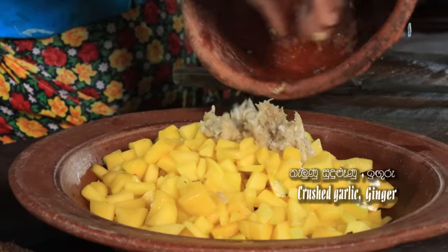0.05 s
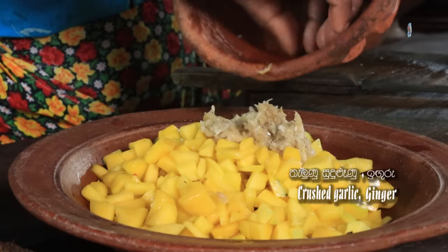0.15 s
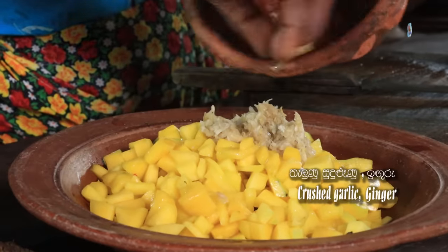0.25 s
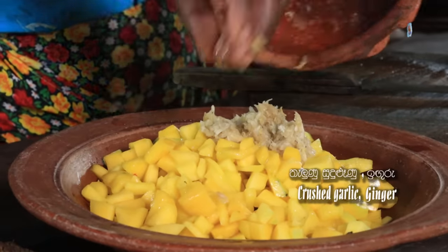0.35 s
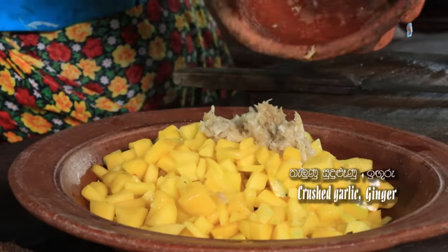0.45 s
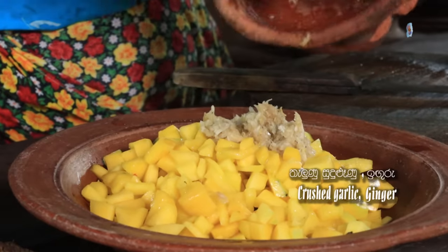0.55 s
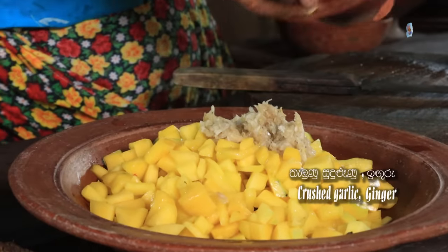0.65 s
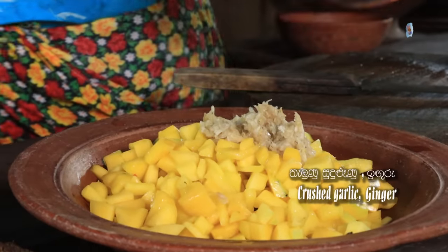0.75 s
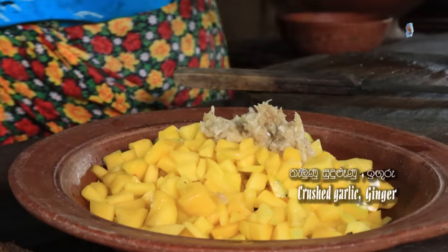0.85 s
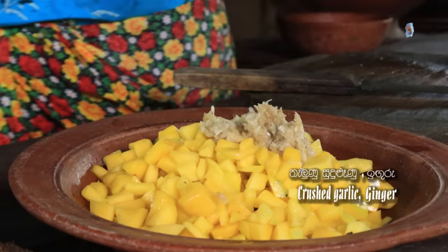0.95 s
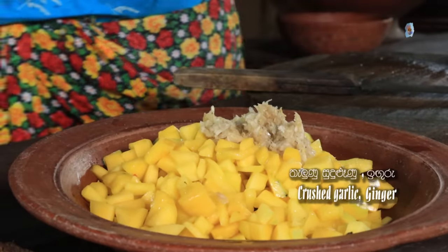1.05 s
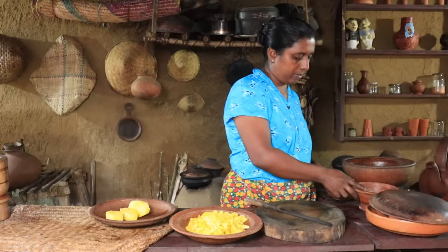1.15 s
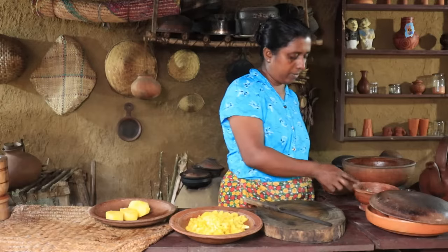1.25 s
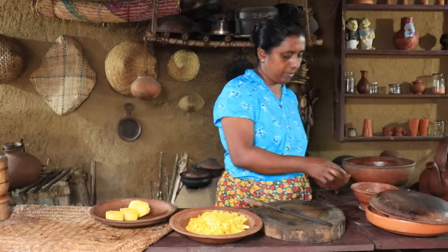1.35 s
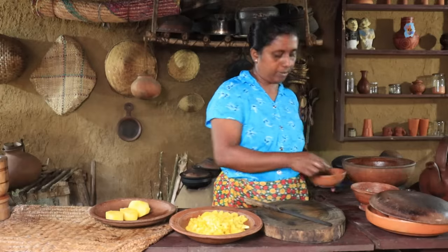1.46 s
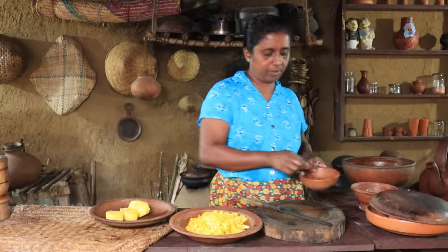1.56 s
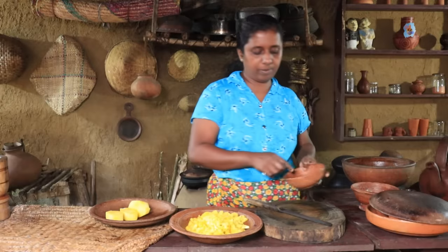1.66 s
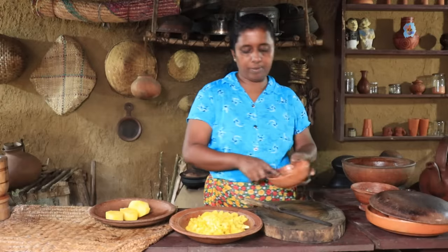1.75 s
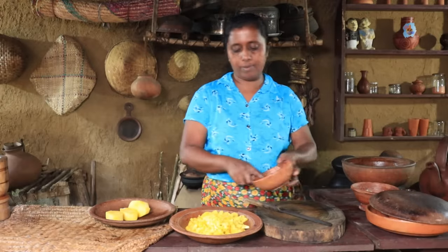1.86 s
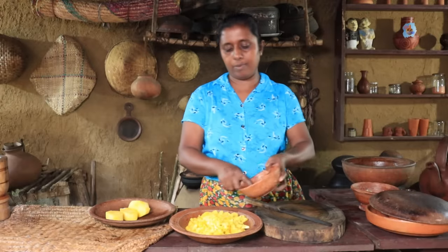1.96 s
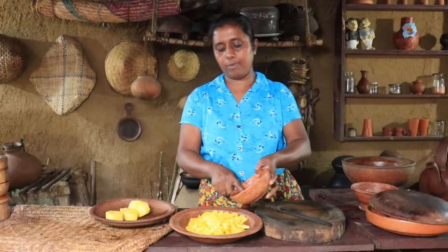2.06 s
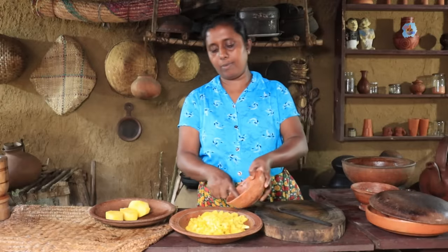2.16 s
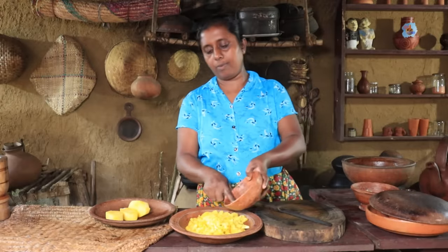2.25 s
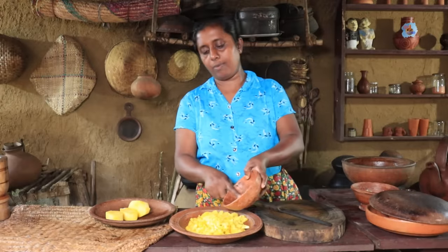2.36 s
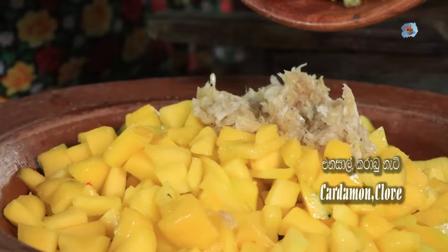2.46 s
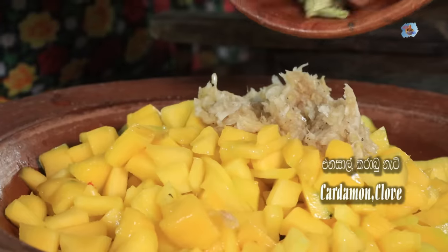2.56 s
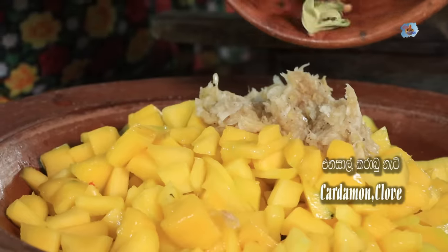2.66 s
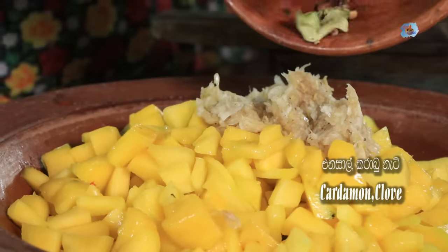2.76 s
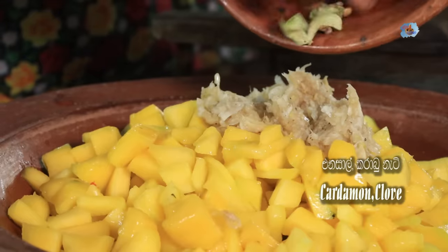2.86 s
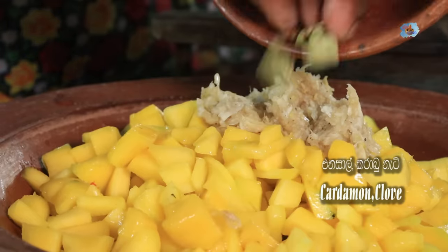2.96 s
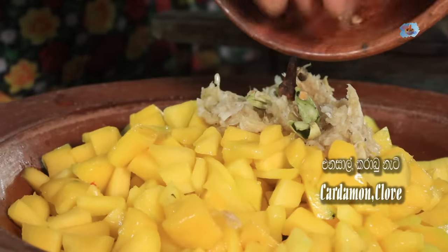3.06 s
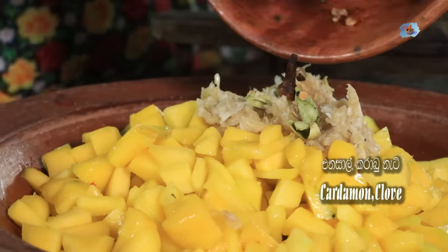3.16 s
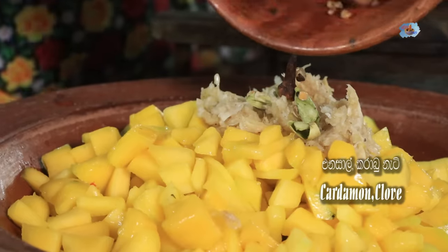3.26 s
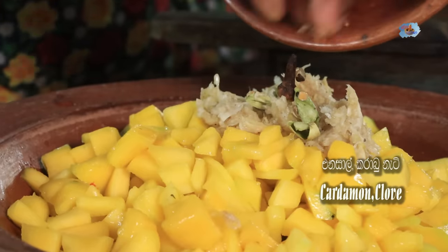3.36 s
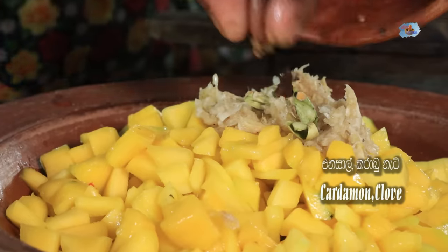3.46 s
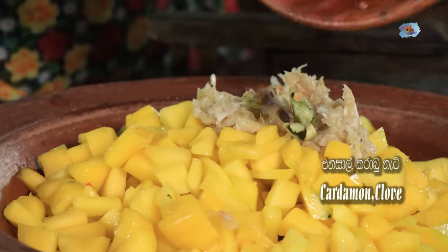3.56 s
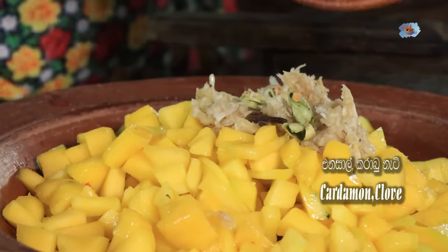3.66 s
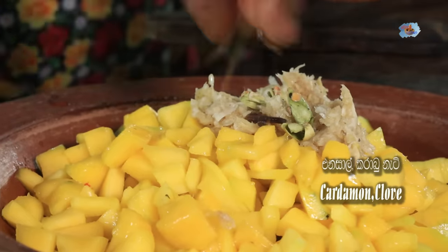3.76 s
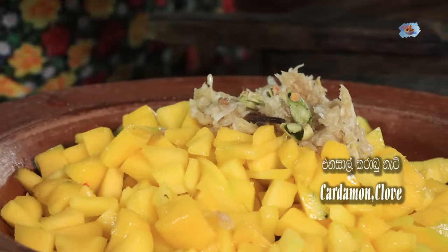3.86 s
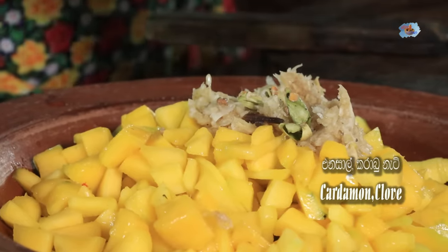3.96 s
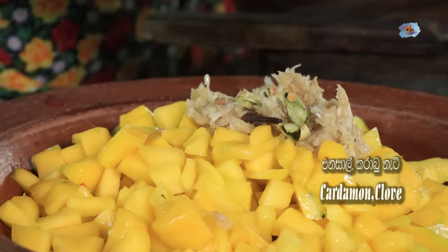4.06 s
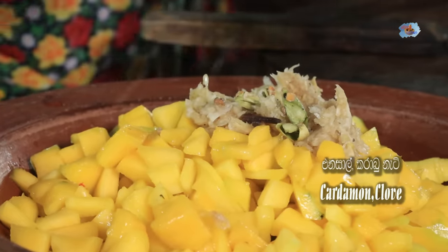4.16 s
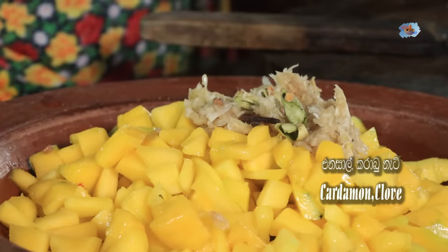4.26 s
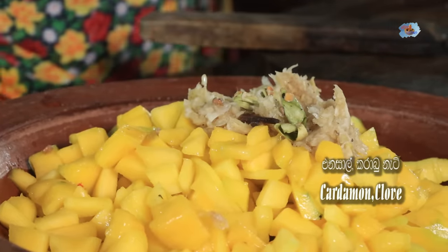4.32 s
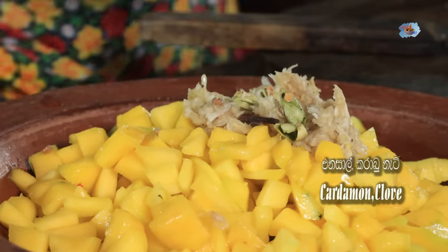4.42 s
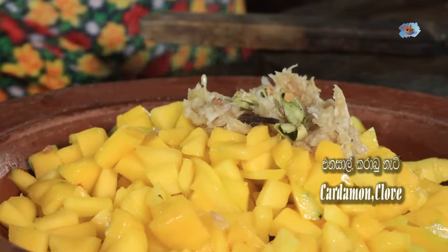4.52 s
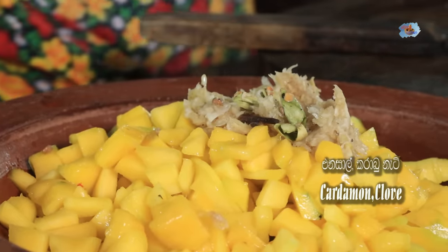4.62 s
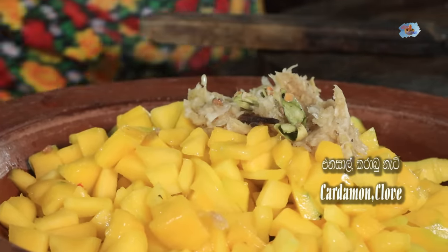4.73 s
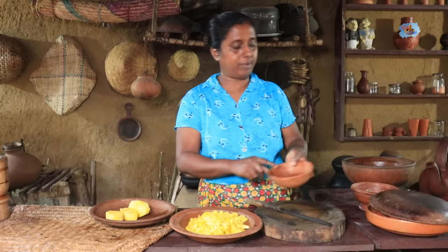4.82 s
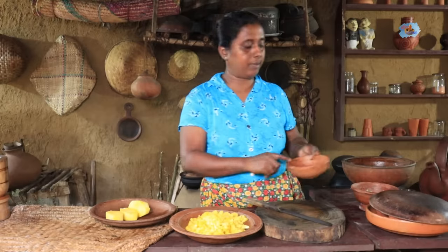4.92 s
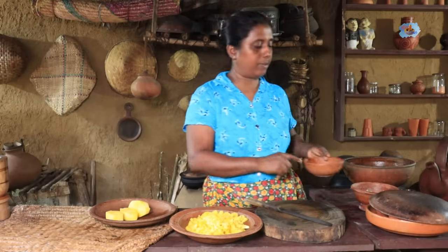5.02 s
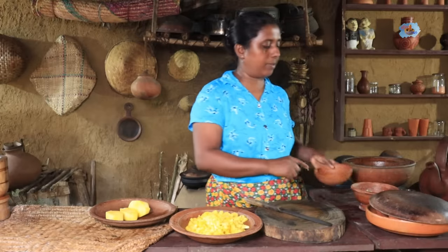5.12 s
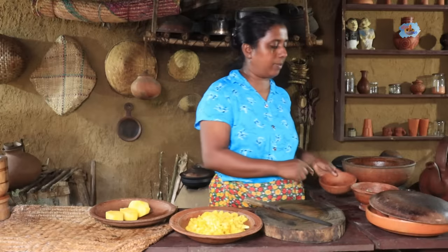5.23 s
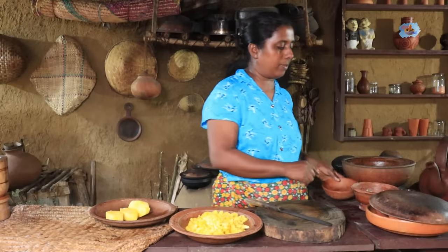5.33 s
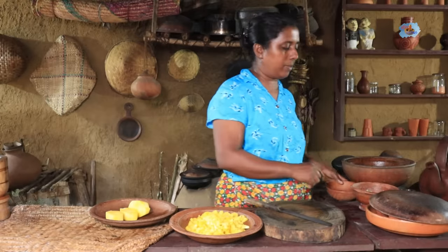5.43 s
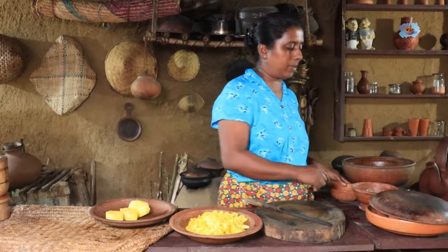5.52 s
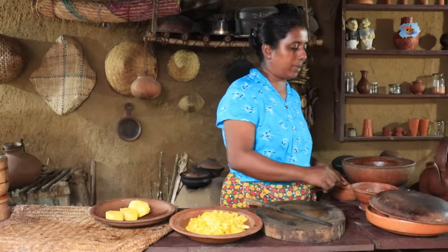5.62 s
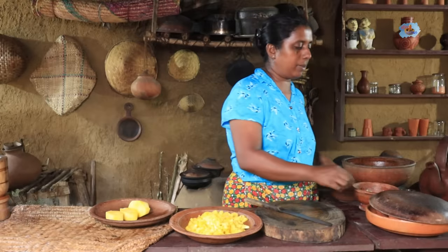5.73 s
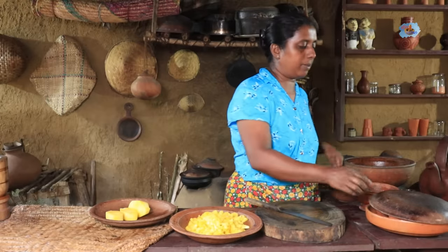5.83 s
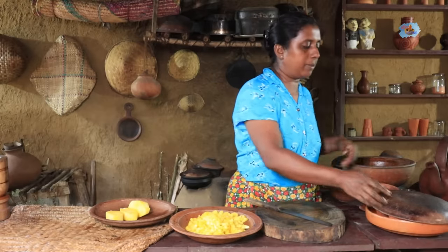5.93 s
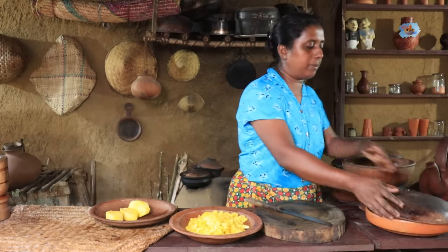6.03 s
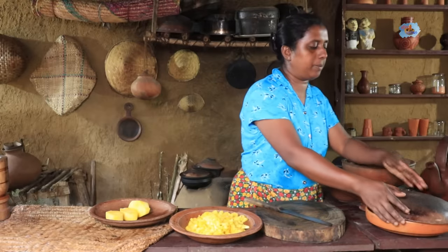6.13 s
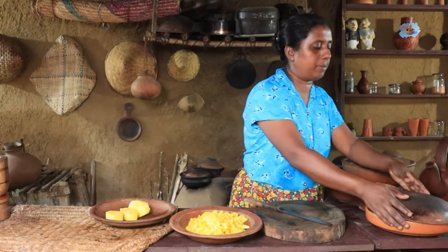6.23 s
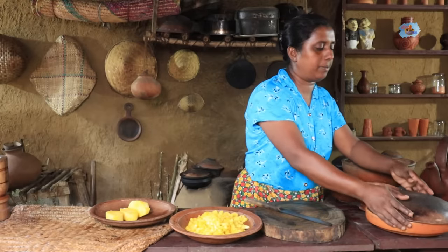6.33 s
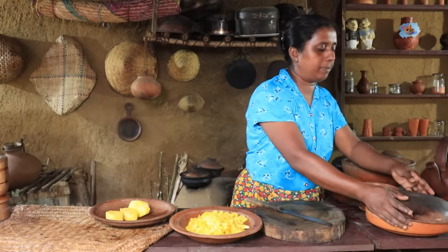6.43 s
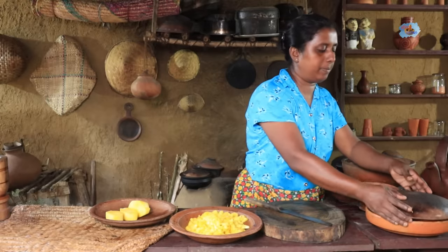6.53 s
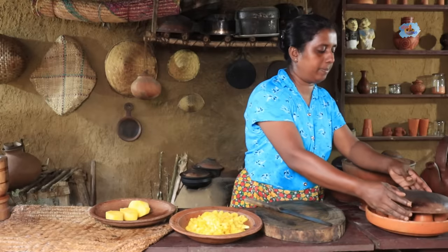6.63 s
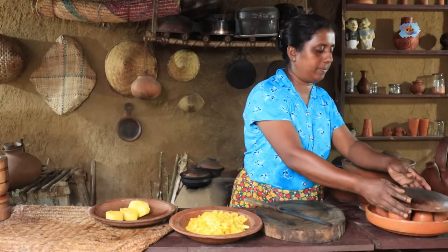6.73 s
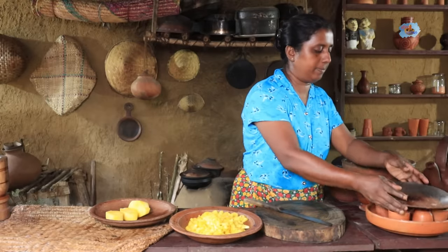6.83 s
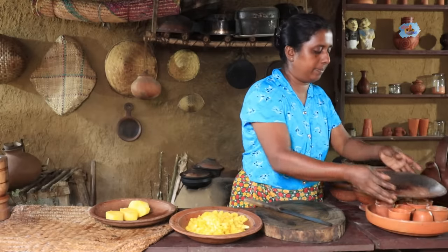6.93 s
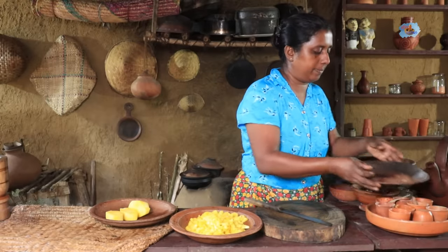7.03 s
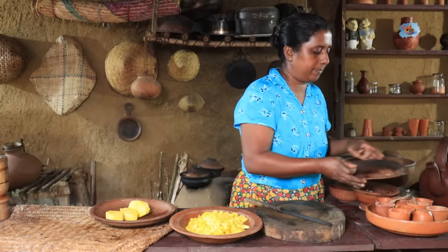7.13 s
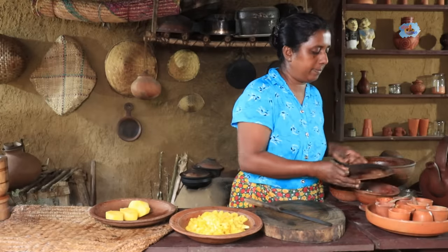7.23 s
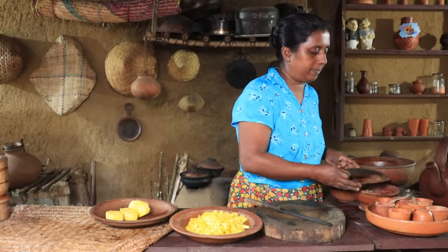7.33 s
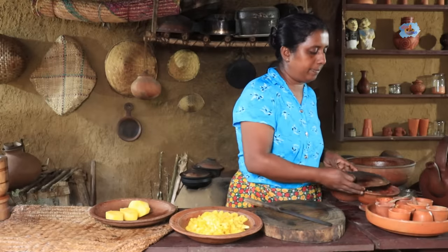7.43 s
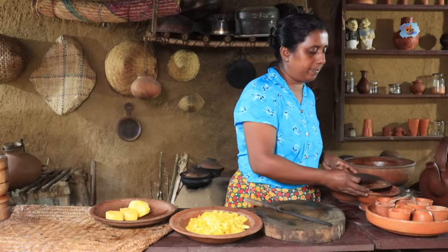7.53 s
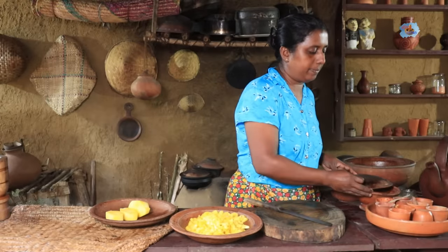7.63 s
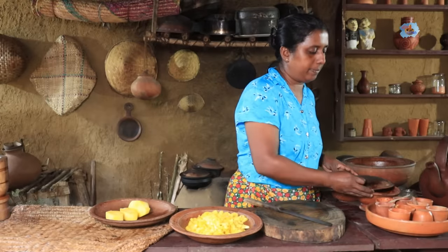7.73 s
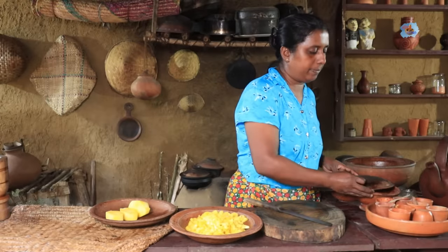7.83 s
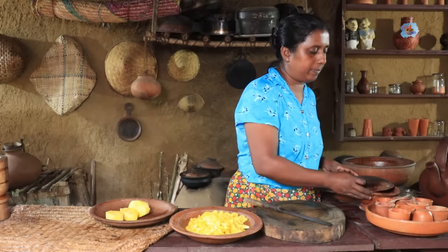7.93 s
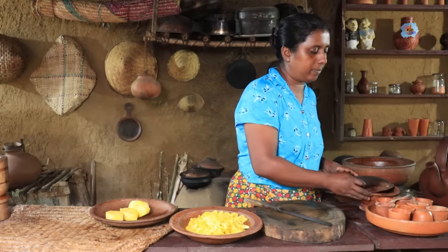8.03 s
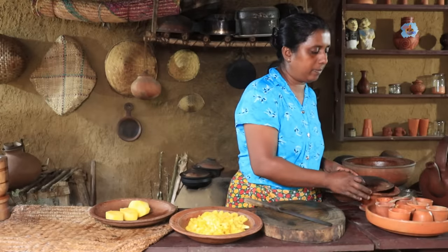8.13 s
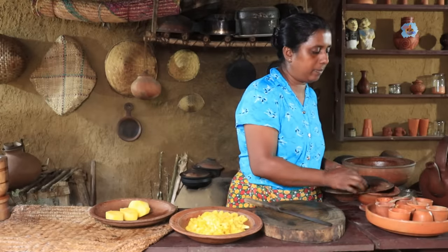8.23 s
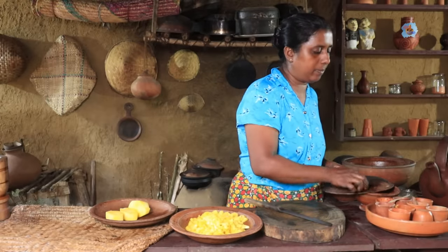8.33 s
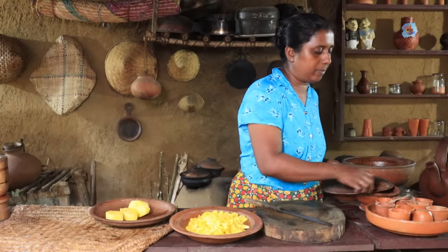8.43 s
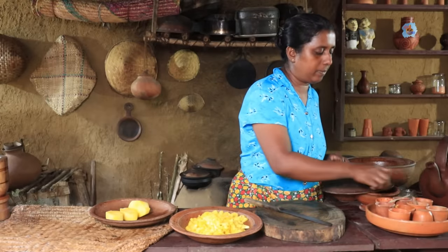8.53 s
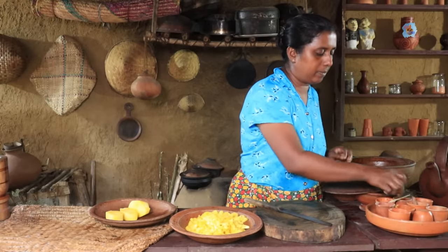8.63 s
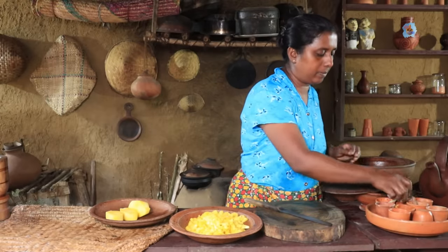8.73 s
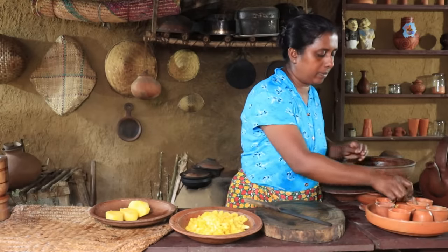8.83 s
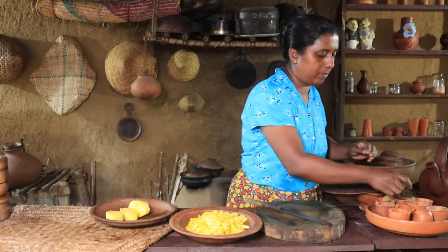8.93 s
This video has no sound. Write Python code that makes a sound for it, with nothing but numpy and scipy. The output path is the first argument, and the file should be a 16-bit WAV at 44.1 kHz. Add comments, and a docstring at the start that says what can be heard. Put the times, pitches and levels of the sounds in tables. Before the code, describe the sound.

Soft scratches and ticks on clay give way to hollow crockery knocks on a wooden table, with birds calling outside a quiet kitchen.

```python
"""Clay vessels in a quiet open kitchen: a bowl set down on a wooden table rocks; a lid scrapes off a wide pan
and is laid on another pot, where it settles. Each blow rings decaying modes, a noise wash and a short crack.
Before that, fingers sweep ginger and whole spices out of small clay dishes: clumped noise, ticks and resonances.
Birds (gliding, warbling sines with echoes) call outside, over coloured noise for air and insects and a faint
low hum."""
import sys
import numpy as np
from scipy import signal
from scipy.fft import rfft, irfft, next_fast_len
from scipy.io import wavfile
from scipy.ndimage import uniform_filter1d, map_coordinates

SR = 44100
rng = np.random.default_rng(int(sys.argv[2]) if len(sys.argv) > 2 else 0)


def dump_mix(stems):
    """Bounce the given channels to the path in sys.argv[1] as a 16-bit WAV at rate SR."""
    frames = np.atleast_2d(stems).T  # one column per channel
    limited = np.clip(frames, -1, 1)  # hard clip at full scale
    pcm = np.round(limited * 32767).astype(np.int16)
    wavfile.write(sys.argv[1], SR, pcm)


N = 396018
T = np.arange(SR // 2) / SR  # time since an event's start, s

# bowl contacts: t/s, relative thud/dB, knock/dB, clack/dB
BOWL_CONTACTS = [(5.49, -13.5, -21, -31), (5.6221, -12.5, -18.5, -34.5), (5.75, -21, -29, -39.5),
                 (5.798, -17.5, -22, -39.5), (5.826, -20.5, -37.5, -45)]
# pan modes with the table under it: f/Hz, relative level/dB, t60/s
PAN_MODES = [(169.3, -8.5, 0.21), (294, -3.5, 0.2), (375, -4.5, 0.34), (408, -9, .3), (501, 0.5, 0.15),
             (634, -6, 0.11), (778, -13, 0.19), (996, -9, .09), (1085, -6.5, 0.16), (1138, -5, 0.15),
             (1402, -14, 0.31), (1610, -15, 0.19), (1750, -7, 0.061), (1990, -19, 0.11),
             (2214, -1.5, 0.073), (2530, -7, 0.12), (3160, -16, 0.1), (3290, -20, 0.077), (4050, -34, .12)]
# crowd of weaker pan modes: f/Hz, relative density/dB per Hz
PAN_CROWD = [(47, -58), (80, -37), (340, -1.5), (456, -8.5), (506, -2.5), (665, -10), (1120, -13),
             (2240, -21.5), (2710, -30), (3140, -24.5), (4480, -41), (12000, -46), (15600, -86),
             (22000, -120)]
# left-right likeness of vessel sounds: f/Hz, likeness/1
VESSEL_ALIKE = [(200, .98), (450, 0.93), (900, 0.67), (2000, 0), (5000, 0.026)]
# left-right likeness of handwork: f/Hz, likeness/1
HANDWORK_ALIKE = [(200, 0.98), (2000, .15), (10000, 0.49)]


def amp(db):
    """Decibels to gain."""
    return 10 ** (np.asarray(db) / 20)


def unit(x):
    """Scale to rms 1."""
    return x / np.sqrt(np.mean(x ** 2) + 1e-20)


def decay(t, t60_s):
    """Exponential fade, 60 dB down after t60_s."""
    return np.exp(-np.log(1000) * t / t60_s)


def along(points, hz):
    """Read (Hz, value) points on a log axis."""
    f, v = np.transpose(points)
    return np.interp(np.log(hz + 1), np.log(f + 1), v)


def wobble(rate_hz, n):
    """Smooth random curve, rate_hz knots a second."""
    knots = rng.standard_normal(int(n * rate_hz / SR) + 4)
    return map_coordinates(knots, [np.arange(n) * rate_hz / SR])


def filtered(x, response):
    """Multiply the spectrum of x by a response of frequency."""
    n = x.shape[-1]
    m = next_fast_len(n + 8192)
    return irfft(rfft(x, m) * response(np.fft.rfftfreq(m, 1 / SR)), m)[..., :n]


def band(x, edges_hz):
    """Causal band-pass."""
    sos = signal.butter(3, edges_hz, 'band', fs=SR, output='sos')
    return signal.sosfilt(sos, x)


def noise(spectrum, alike, n):
    """Stereo noise of rms 1; the mid/side balance sets the likeness of the sides per frequency."""
    def colour(hz):
        turn = np.arccos(np.clip(along(alike, hz), -1, 1)) / 2
        return amp(along(spectrum, hz)) * [np.cos(turn), np.sin(turn)]

    mid, side = filtered(rng.standard_normal((2, n)), colour)
    return unit(np.array([mid + side, mid - side]))


def tilted(spectrum, tilt_db):
    """Tilt a spectrum by tilt_db per octave."""
    return [(hz, db + tilt_db * np.log2(hz)) for hz, db in spectrum]


def from_right(x, lag_ms):
    """A source to the right reaches the left side lag_ms later."""
    sides = np.array([[1], [-1]])
    return filtered(x, lambda hz: np.exp(-1j * np.pi * hz * lag_ms / 1000 * sides))


def add(out, s, x):
    """Mix x into out at time s."""
    i = round(s * SR)
    x = x[..., max(-i, 0):N - i]
    out[..., max(i, 0):max(i, 0) + x.shape[-1]] += x


def background():
    """Steady outdoor air with insects, and a low hum that wavers, comes and goes."""
    # breeze and insects: f/Hz, relative density/dB per Hz
    air_spectrum = [(12, -49), (20, -46), (49, -1), (98, 0.5), (126, -1.5), (157, -5), (180, -5), (393, -7),
                    (491, -7), (1580, -13), (3750, -17), (5690, -22), (6910, -16.5), (7730, -24.5),
                    (15500, -27.5)]
    # left-right likeness of air: f/Hz, likeness/1
    air_alike = [(60, 1), (180, 0.68), (550, 0.49), (1650, 0), (15000, 0.015)]
    # spells of louder hum: start/s, end/s
    hum_spells = [(0, 1.19), (2.39, 4.87)]
    air_db, hum_hz, hum_loud_db, hum_rest_db = -51.5, 189.5, -59.5, -66

    air = amp(air_db + 1.26 * wobble(2.75, N)) * noise(air_spectrum, air_alike, N)
    t = np.arange(N) / SR
    in_spell = sum(1.0 * (t >= start) * (t < end) for start, end in hum_spells)
    loud = uniform_filter1d(in_spell, size=SR // 20)
    hum_db = hum_rest_db + (hum_loud_db - hum_rest_db) * loud + 0.88 * wobble(8.1, N)
    phase = 2 * np.pi * np.cumsum(hum_hz + 1.87 * wobble(14, N)) / SR
    hum = np.sqrt(2) * amp(hum_db) * (np.sin(phase) + amp(-10) * np.sin(2 * phase))
    return air + hum


def echoes(x, t60_s, rise_s):
    """Diffuse reflections from walls and trees: decaying noise, unrelated on the two sides."""
    t = np.arange(SR) / SR
    tail = rng.standard_normal((2, SR)) * decay(t, t60_s) * (1 - np.exp(-t / rise_s))
    return signal.fftconvolve(x[None], tail / np.linalg.norm(tail[0]), axes=1)


def through_trees(pitch_hz, blur_db):
    """A note on a pitch curve, blurred and drawn out by the trees it passes through."""
    n = len(pitch_hz)
    tone = np.sin(2 * np.pi * np.cumsum(pitch_hz) / SR)
    note = tone * signal.windows.tukey(n, .15) * amp(blur_db * wobble(150, n))
    heard = echoes(note, t60_s=0.7, rise_s=.0016)
    return heard / np.sqrt(np.sum(heard ** 2) / (2 * n))  # rms 1 if packed into the note's length


def far_birds():
    """Whistles start hoarse, glide to a pitch and hold it; chatter wavers fast and widely."""
    # scooped whistles: t/s, length/s, held f/Hz, level/dB, scoop/share of pitch
    whistles = [(-.03, 0.072, 1977, -46.5, -0.07), (1.32, .11, 1197, -50.5, -0.072),
                (1.637, .16, 3297, -55.5, .08), (2.224, .11, 5470, -55, 0.19), (3.88, 0.1, 3800, -61, .1),
                (4.151, 0.14, 5360, -54.5, 0.17), (5.079, 0.13, 3530, -53.5, .14),
                (7.799, .18, 5580, -61.5, .08)]
    # hoarse chatter: t/s, length/s, f/Hz, level/dB, warble/Hz
    chatter = [(0.579, 0.12, 3000, -56.5, 150), (0.807, 0.075, 2665, -57.5, 110),
               (1.21, 0.53, 1420, -54, 244), (2.479, 0.17, 3900, -62.5, 260),
               (4.846, .39, 2525, -56.5, 222), (6.019, 0.316, 1390, -51.5, 111.5),
               (6.349, 0.63, 1431, -54.5, 243), (6.95, 0.337, 1618, -56.5, 170)]
    scoop_s, hoarseness, warble_share = .042, .8, 0.015  # time constant; share of scoop; share of pitch

    out = np.zeros((2, N))
    for s, length_s, hz, db, scoop in whistles:
        t = T[T < length_s]
        glide = scoop * np.exp(-t / scoop_s) * (1 + hoarseness * wobble(1500, len(t)))
        pitch_hz = hz * (1 - glide + warble_share * wobble(700, len(t)))
        add(out, s, amp(db) * through_trees(pitch_hz, blur_db=4.5))
    for s, length_s, hz, db, warble_hz in chatter:
        pitch_hz = hz + warble_hz * wobble(700, int(length_s * SR))
        add(out, s, amp(db) * through_trees(pitch_hz, blur_db=7))
    return out


def stroke(length_s, attack_s, release_s):
    """Attack, hold and release of a rubbing movement, with exponential ends."""
    return (1 - np.exp(-T / attack_s)) * np.exp(-np.maximum(T - length_s, 0) / release_s)


def grit(tilt_db, grain_db, grain_rate_hz):
    """Rough clay rubbed: a hiss of tiny catches that come in clumps."""
    # rubbed clay: f/Hz, relative density/dB per Hz
    grit_spectrum = [(300, -5), (1200, 6), (2500, 2), (5000, 1), (9000, -2.5), (15000, -14.5)]
    catches = amp(grain_db * wobble(grain_rate_hz, len(T)) + 2.2 * wobble(90, len(T)))
    return unit(noise(tilted(grit_spectrum, tilt_db), HANDWORK_ALIKE, len(T)) * catches)


def dish(x):
    """Bright resonances of the small dish, as parallel band-passes."""
    # dish resonances: f/Hz, width/Hz, relative level/dB
    resonances = [(3070, 220, -23), (4290, 75, 0), (5660, 94, 3), (8100, 260, -10)]

    def response(f):
        return sum(amp(db) * 1j * f * w / (c * c - f * f + 1j * f * w) for c, w, db in resonances)

    return filtered(x, response)


def sweeps(attack_share, release_s):
    """Skin slips over grit in tiny catches, which also set the dish ringing."""
    # fingers sweeping food: t/s, length/s, relative level/dB, tilt/dB per octave
    finger_sweeps = [(.24, 0.053, -55.5, 1.5), (0.294, 0.081, -46.5, 1.5), (.742, 0.034, -51.5, 4.5),
                     (2.528, 0.04, -49.5, 20), (2.58, 0.091, -61.5, 14), (2.931, 0.051, -54.5, 4.5),
                     (2.996, 0.061, -48.5, 7), (3.321, 0.026, -51, 1), (3.388, 0.091, -47, 2.5),
                     (4.126, .03, -50.5, 3)]
    ring_db = -10.5  # dish ring re grit
    out = np.zeros((2, N))
    for s, length_s, db, tilt_db in finger_sweeps:
        rub = grit(tilt_db, grain_db=3.0, grain_rate_hz=1100)
        rubbed_dish = rub + amp(ring_db) * unit(dish(rub))
        add(out, s, amp(db) * stroke(length_s, attack_share * length_s, release_s) * rubbed_dish)
    return out * amp([[-1.2], [1.2]])  # right louder


def knock(knock_s):
    """Dull, quickly damped noise of crockery held in the hand."""
    spectrum = [(100, -32), (450, -2.5), (1200, -6), (3000, -12.5), (9000, -32.0)]  # f/Hz, dB per Hz
    return noise(spectrum, VESSEL_ALIKE, len(T)) * np.exp(-T / knock_s)


def taps(tick_s, ring_s, skip_s, skip_db, count):
    """Nails and seeds give a dry tick, a soft knock and a dish ring prolonged by skipping; faint strays join."""
    # strikes on a dish: t/s, relative tick/dB, relative ring/dB, tick tilt/dB per octave
    strikes = [(.246, -44.5, -46, -3.5), (.389, -42.5, -41.5, -3), (1.189, -41.5, -74, 7.5),
               (2.413, -58, -51, 0), (2.932, -56, -41.5, -1.5), (2.969, -51, -47, 2),
               (3.022, -44.5, -56, 2), (3.326, -59, -40, 1), (3.375, -46.5, -37, -1.5),
               (3.487, -55, -49, 5), (4.101, -48.5, -48, -0.5), (4.141, -45.5, -47, -1)]
    # tick: f/Hz, relative density/dB per Hz
    tick_spectrum = [(1000, -7), (3000, -3.5), (9000, -7.5), (15000, -11.5)]
    stray_from_s, stray_to_s, stray_db = 0.046, 3.7, -59  # while the dishes are in hand
    knock_db = -8  # re the table's tick level

    out = np.zeros((2, N))
    stray_times = rng.uniform(stray_from_s, stray_to_s, count)
    strays = [(s, stray_db, stray_db - 12, 0) for s in stray_times]
    contact = np.exp(-T / ring_s) + amp(skip_db) * np.exp(-T / skip_s)
    for s, tick_db, ring_db, tilt_db in strikes + strays:
        tick = noise(tilted(tick_spectrum, tilt_db), HANDWORK_ALIKE, len(T))
        ring = dish(tick * contact) / dish(tick).std()
        hit = amp(tick_db + 4) * tick * np.exp(-T / tick_s)
        hit = hit + amp(ring_db - 2) * ring
        hit = hit + amp(tick_db + knock_db) * knock(knock_s=0.016)
        add(out, s, hit)
    return out * amp([[-.9], [.9]])


def bumps():
    """A soft hand on the crockery gives the knock alone."""
    # soft bumps: t/s, level before decay/dB
    hand_bumps = [(.749, -42.5), (1.0, -49.5), (4.1, -52.5), (8.186, -46), (8.569, -43.5)]
    out = np.zeros((2, N))
    for s, db in hand_bumps:
        add(out, s, amp(db) * knock(knock_s=0.023))
    return out


def dying(x):
    """Each frequency fades at the kitchen's own speed."""
    # kitchen reverberation: f/Hz, t60/s
    kitchen_t60 = [(150, 0.54), (400, 0.35), (1000, 0.29), (2500, 0.21), (8000, 0.14)]
    hz, t, z = signal.stft(x, SR, nperseg=256)
    faded = z * decay(t, along(kitchen_t60, hz)[:, None])
    return signal.istft(faded, SR, nperseg=256)[1][:, :x.shape[-1]]


def ringing(modes, spread_db=0):
    """Sum of decaying sines, each mode's level optionally scattered at random."""
    return sum(amp(db + rng.normal(0, spread_db)) * decay(T, t60_s) * np.sin(2 * np.pi * hz * T)
               for hz, db, t60_s in modes)


def clay(blows, modes, wash, low_hz, wash_db, wash_life_s, push_hz, push_s, push_db,
         rebound_s, rebound, lag_ms, level_db):
    """Blows ring a vessel's modes; the contact shares its energy among deep, middle and high ones."""
    # tops of thud, knock and clack bands: f/Hz
    tops_hz = (620, 1500, 9000)
    crack_spectrum = [(200, -9.0), (1300, 16), (2200, -13), (4000, -5.5), (12000, -51)]  # f/Hz, dB per Hz
    bands_hz = list(zip((low_hz, *tops_hz), tops_hz))
    out, head = np.zeros((2, N)), SR * 3 // 100  # levels refer to the first 30 ms
    # first jolt of the whole wall
    push = T / push_s * np.exp(1 - T / push_s) * np.sin(2 * np.pi * push_hz * T)
    hardest_db = max(blow[3] for blow in blows)
    for s, *levels in blows:
        dull_db = (levels[2] - hardest_db) / 3500  # per Hz: a gentler contact lasts longer, spares high modes
        ring = ringing([(hz, db + dull_db * hz, t60_s) for hz, db, t60_s in modes], spread_db=3.4)
        ring = ring + rebound * np.interp(T - rebound_s, T, ring, left=0)  # a wall answers once
        ring = from_right(ring / ring[:head].std(), lag_ms)
        crowd = dying(noise(wash, VESSEL_ALIKE, len(T))) * np.exp(-T / wash_life_s)
        crack = from_right(noise(crack_spectrum, VESSEL_ALIKE, len(T))[0], lag_ms) * np.exp(-T / 0.0022)
        hardness = amp(12.0 + levels[2] - levels[0])  # a bright contact cracks more
        hit = (ring + amp(wash_db) * crowd + hardness * crack) * (1 - np.exp(-T / 0.001))
        for edges_hz, db in zip(bands_hz, levels):
            part = band(hit, edges_hz)
            add(out, s, amp(db + level_db) * part / part[:, :head].std())
        add(out, s, from_right(amp(levels[1] + push_db) * push, lag_ms))
    return out


def table_thump(thump_hz, t60_s, thump_db):
    """The wooden table booms briefly, a decaying sine, under each blow of the bowl."""
    out = np.zeros((2, N))
    boom = np.sin(2 * np.pi * thump_hz * T) * decay(T, t60_s) * (1 - np.exp(-T / 0.0043))
    for s, thud_db, _, _ in BOWL_CONTACTS:
        add(out, s, amp(thud_db + thump_db) * boom)
    return out


def skids(attack_s, release_s):
    """A heavy vessel slides a short way with a duller rasp as it is lifted or settles."""
    # skids: t/s, length/s, relative level/dB, tilt/dB per octave
    vessel_skids = [(5.827, 0.097, -50.5, -4.5), (6.557, 0.039, -50.5, 1.5), (7.667, 0.025, -40.5, -5),
                    (7.832, .07, -48.5, -4), (8.185, 0.12, -54, -3)]
    out = np.zeros((2, N))
    for s, length_s, db, tilt_db in vessel_skids:
        rasp = grit(tilt_db, grain_db=2.5, grain_rate_hz=1700)
        add(out, s, amp(db) * stroke(length_s, attack_s, release_s) * rasp)
    return out * amp([[-.9], [.9]])


def lid_drag(catch_rate_hz, catch_db, attack_s, release_s, lag_ms):
    """The rim scratches, catching and slipping irregularly; every catch rings the pan a little."""
    # rim dragged along the pan, lightly then firmly: t/s, length/s, relative level/dB
    rim_drags = [(6.561, 0.049, -44), (6.602, 0.045, -34.5)]
    scratch_db, rumble_db = -14.5, -1
    force, scratch = np.zeros(N), np.zeros((2, N))
    for s, length_s, db in rim_drags:
        press = amp(db) * stroke(length_s, attack_s, release_s)
        add(force, s, press)
        add(scratch, s, amp(scratch_db) * press * grit(tilt_db=1.0, grain_db=5, grain_rate_hz=400))
    catches = (rng.random(N) < catch_rate_hz / SR) * rng.standard_normal(N)
    tone = from_right(unit(signal.fftconvolve(catches, ringing(PAN_MODES))[:N]), lag_ms)
    rumble = noise(PAN_CROWD, VESSEL_ALIKE, N)
    return scratch + force * (amp(catch_db) * tone + amp(rumble_db) * rumble)


def near_bird(trill_hz, swing_hz, echo_db, wall_s, wall_db, lag_ms):
    """A buzzy note, a low upward slur and a loud whistle, thrown back by a wall and echoing outside."""
    # notes: t/s, length/s, first f/Hz, last f/Hz, mid sag/Hz, relative level/dB, trill depth/1
    notes = [(7.418, 0.056, 1743, 1645, 1, -38.5, 0.94), (7.487, .06, 1096, 1470, 318, -41, 0.15),
             (7.544, .048, 2050, 1978, -32, -29, 0.3)]
    attack_s, release_s, swell_db = 0.014, 0.0074, 5  # every note grows towards its end
    song = np.zeros(N)
    for s, length_s, first_hz, last_hz, sag_hz, db, trill in notes:
        t = T[T < length_s]
        u = t / length_s
        flutter = trill * np.sin(2 * np.pi * trill_hz * t)
        pitch_hz = first_hz + (last_hz - first_hz) * u - sag_hz * np.sin(np.pi * u)
        pitch_hz = pitch_hz + swing_hz * flutter + 12 * wobble(178, len(t))
        ends = np.minimum(1, np.minimum(t / attack_s, (length_s - t) / release_s))
        shape = ends * amp(db + swell_db * (u - 1.0))
        phase = 2 * np.pi * np.cumsum(pitch_hz) / SR
        tone = np.sin(phase) + amp(-23) * np.sin(3 * phase / 2)
        add(song, s, np.sqrt(2) * shape * (1 + 0.19 * flutter) * tone)
    direct = from_right(song, lag_ms) * amp([[2.2], [-3]])  # left louder
    out = direct + amp(echo_db) * echoes(song, t60_s=0.98, rise_s=0.0038)[:, :N]
    add(out, wall_s, amp(wall_db) * song)
    return out


def scene():
    """The three vessels, the handwork and the outdoors."""
    # contacts: t/s, relative thud/dB, knock/dB, clack/dB
    pan_contacts = [(6.16, -42.5, -56, -72), (6.6705, -27.5, -29, -37.5), (6.7075, -38, -25, -35),
                    (6.7243, -24.5, -20, -21.5), (6.745, -23, -43, -48)]
    pot_contacts = [(7.683, -27.5, -34, -46), (7.776, -24, -25.5, -38), (7.797, -20, -21, -26.5),
                    (8.0545, -19, -19, -32)]
    # modes with the table under them: f/Hz, relative level/dB, t60/s
    bowl_modes = [(192.2, -12.5, 0.29), (268, -32, 0.22), (298.3, -5, 0.25), (351.5, -4.5, .13),
                  (377, -29, 0.36), (465.5, -2, 0.16), (491.8, -14, 0.41), (556, -28, 0.29),
                  (771, -13, 0.12), (854, -23.5, 0.1), (963, -21.5, 0.084), (1052, -17.5, 0.18),
                  (1168, -12.5, 0.05), (1230, -22, 0.059), (1330, -31, 0.11), (1564, -36.5, 0.074),
                  (1750, -42, 0.11), (2470, -48, .12), (3220, -34.5, 0.084), (4240, -29, 0.053),
                  (4310, -28.5, 0.072)]
    pot_modes = [(193, -9.5, 0.2), (256, -8, 0.36), (279, 2.5, 0.12), (365.3, -5.5, 0.24),
                 (509, -10.5, 0.25), (591, -1, 0.13), (646, -12, 0.32), (745, -7, 0.15), (813, 2.5, 0.081),
                 (1031, 0, 0.1), (1155, -25, .16), (1390, -19, 0.1), (1764, -16.5, 0.18), (1890, -6, 0.091),
                 (2275, -16.5, 0.11), (3220, -11.5, 0.043)]
    # crowds of weaker modes: f/Hz, relative density/dB per Hz
    bowl_crowd = [(35, -73), (60, -27), (146, -24.5), (182, -12), (232, -12), (296, -1.5), (395, -3),
                  (461, -7.5), (615, -12), (768, -17), (1530, -25.5), (1990, -37), (12000, -65),
                  (15600, -100), (22000, -120)]
    pot_crowd = [(35, -40), (60, -20.5), (265, -2), (395, -4.5), (563, -6), (858, -5.5), (917, -12.5),
                 (1430, -19.5), (1630, -19), (1910, -22), (2430, -28.5), (12000, -48), (15600, -94),
                 (22000, -120)]

    hands = sweeps(attack_share=0.14, release_s=.017)
    hands = hands + taps(tick_s=0.0039, ring_s=0.0046, skip_s=0.014, skip_db=-11.5, count=5) + bumps()
    bowl = clay(BOWL_CONTACTS, bowl_modes, bowl_crowd, low_hz=164, wash_db=-3.5, wash_life_s=0.25,
                push_hz=400, push_s=0.0023, push_db=11.5,
                rebound_s=.0195, rebound=0.2, lag_ms=0.065, level_db=-1.0)
    table = table_thump(thump_hz=99, t60_s=0.26, thump_db=-21.5)
    pan = clay(pan_contacts, PAN_MODES, PAN_CROWD, low_hz=165, wash_db=0.5, wash_life_s=0.24,
               push_hz=1290, push_s=0.00049, push_db=10.5,
               rebound_s=.012, rebound=0.16, lag_ms=0.104, level_db=-1)
    pot = clay(pot_contacts, pot_modes, pot_crowd, low_hz=55.3, wash_db=-1.5, wash_life_s=0.23,
               push_hz=555, push_s=0.00097, push_db=9.5,
               rebound_s=.016, rebound=0.09, lag_ms=0.067, level_db=-1.5)
    sliding = skids(attack_s=0.005, release_s=0.016)
    sliding = sliding + lid_drag(catch_rate_hz=300, catch_db=-2.5, attack_s=0.0042, release_s=0.028, lag_ms=0.15)
    birds = far_birds()
    birds = birds + near_bird(trill_hz=111, swing_hz=150, echo_db=-3.0, wall_s=.058, wall_db=-13.5, lag_ms=.17)
    return background() + birds + hands + bowl + table + pan + pot + sliding


def record(dry):
    """Nothing passes above the band limit."""
    top_hz = 15830
    return filtered(dry, lambda hz: hz < top_hz)


dry = scene()
out = record(dry)
dump_mix(out)
```